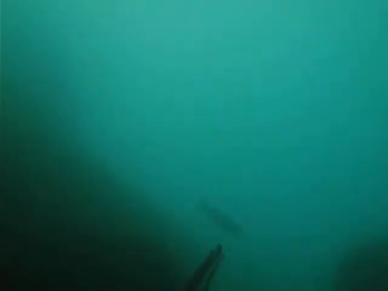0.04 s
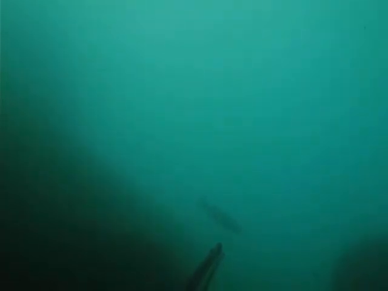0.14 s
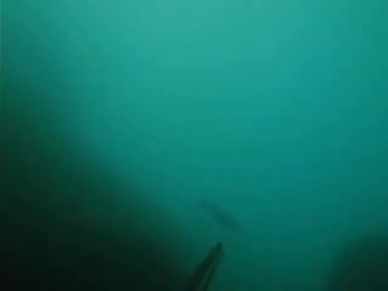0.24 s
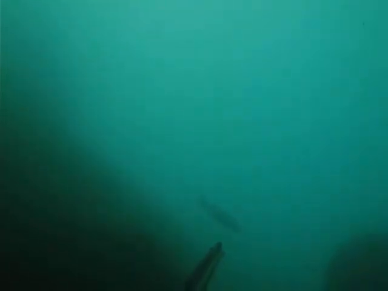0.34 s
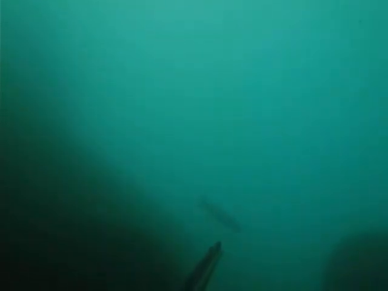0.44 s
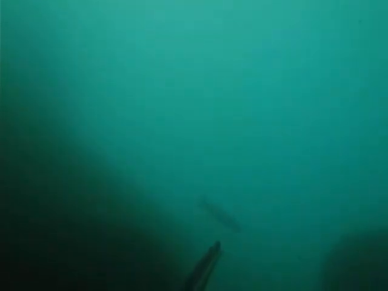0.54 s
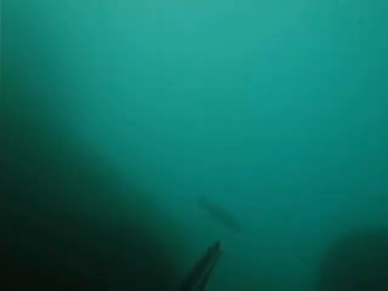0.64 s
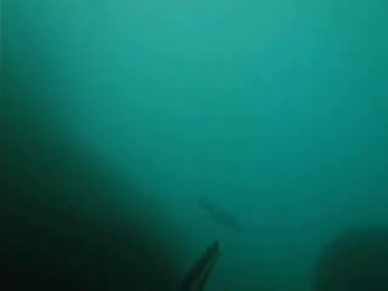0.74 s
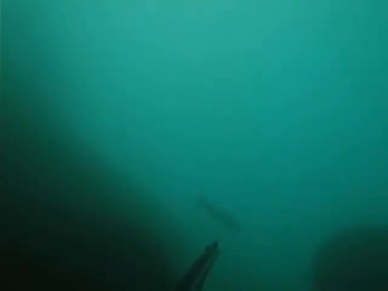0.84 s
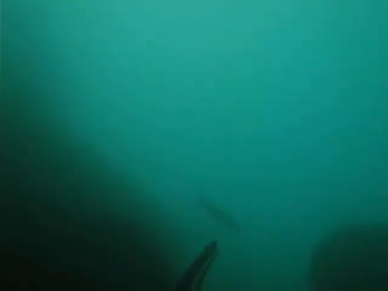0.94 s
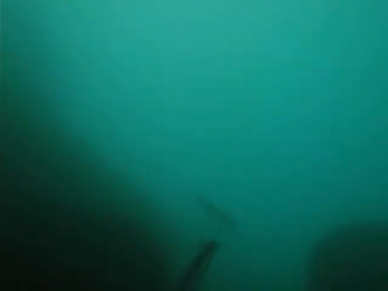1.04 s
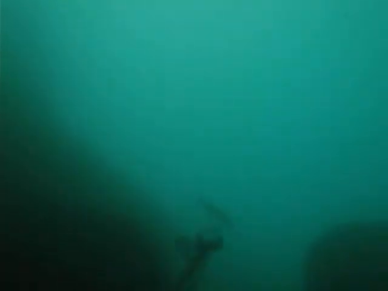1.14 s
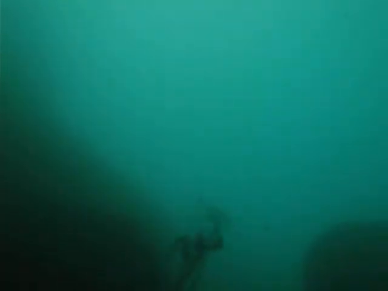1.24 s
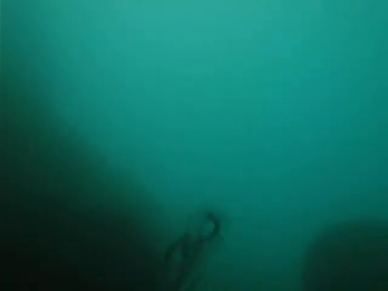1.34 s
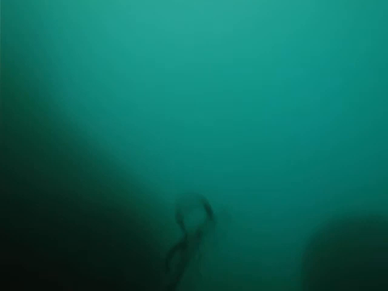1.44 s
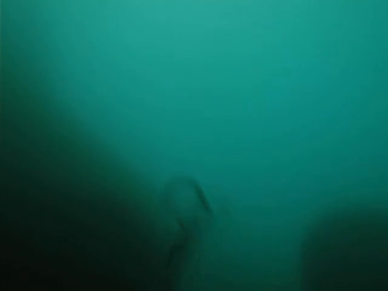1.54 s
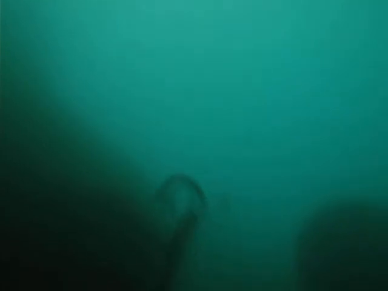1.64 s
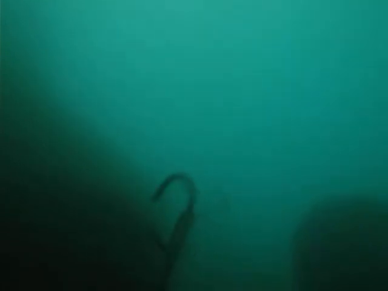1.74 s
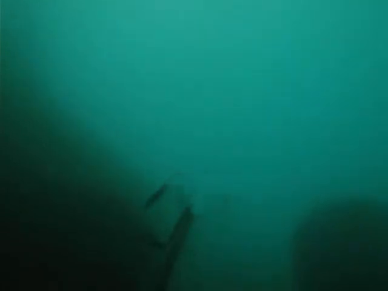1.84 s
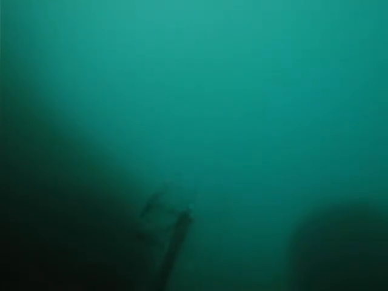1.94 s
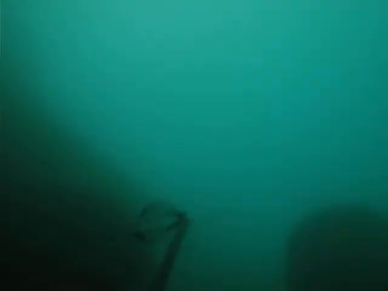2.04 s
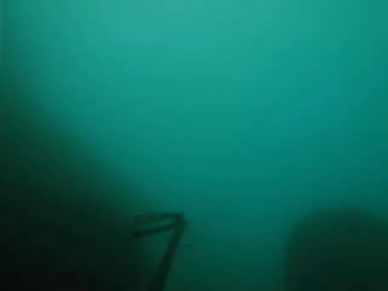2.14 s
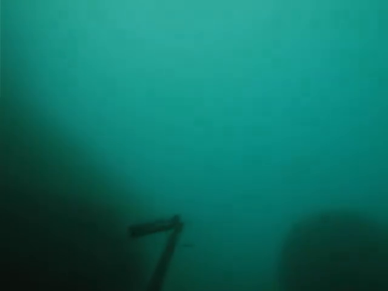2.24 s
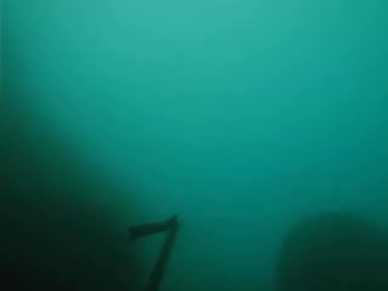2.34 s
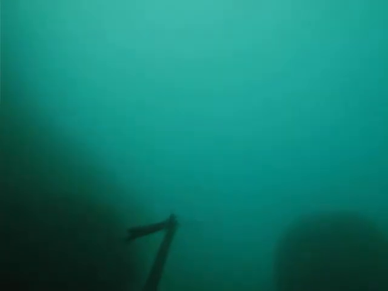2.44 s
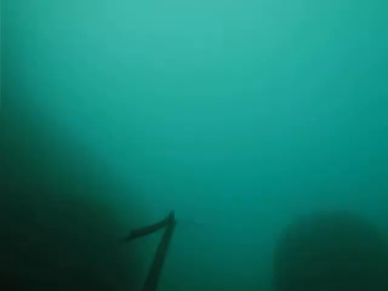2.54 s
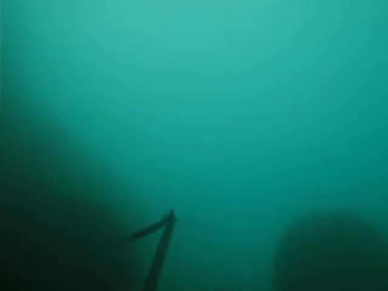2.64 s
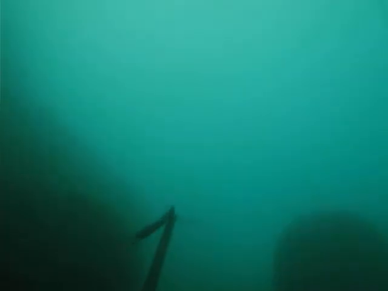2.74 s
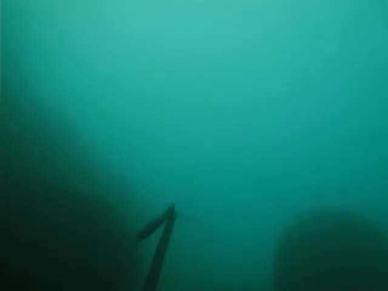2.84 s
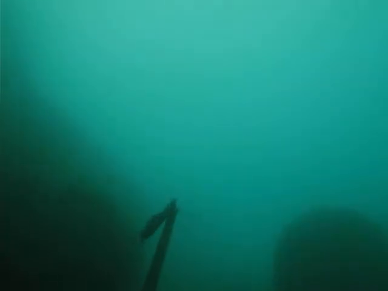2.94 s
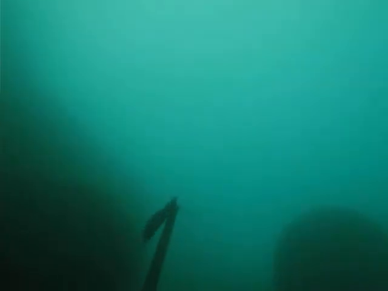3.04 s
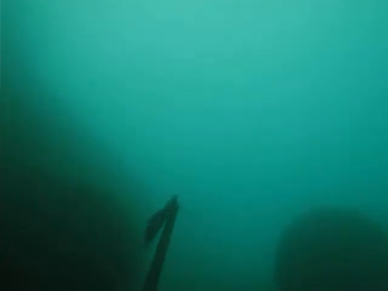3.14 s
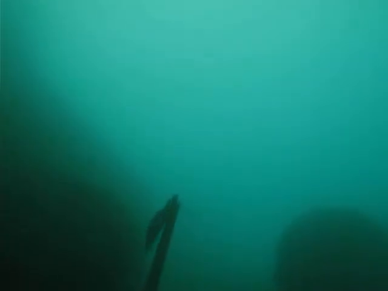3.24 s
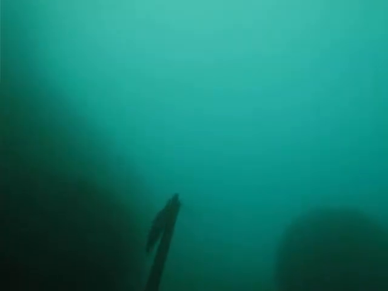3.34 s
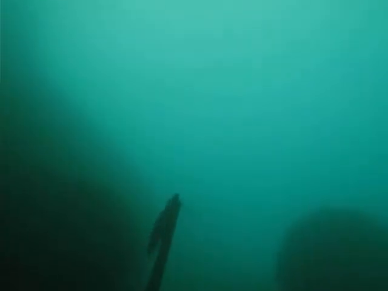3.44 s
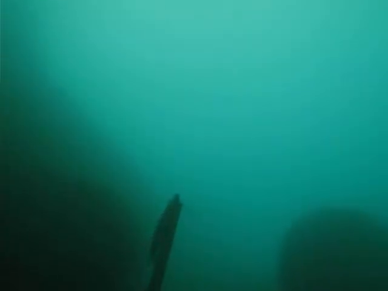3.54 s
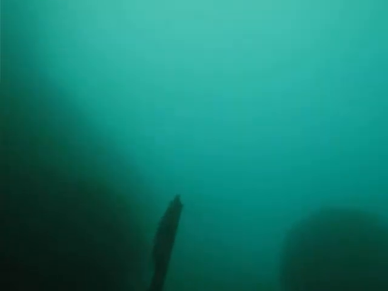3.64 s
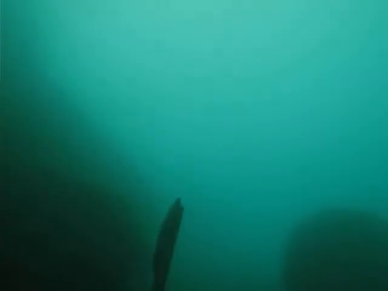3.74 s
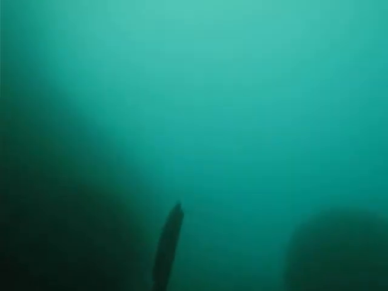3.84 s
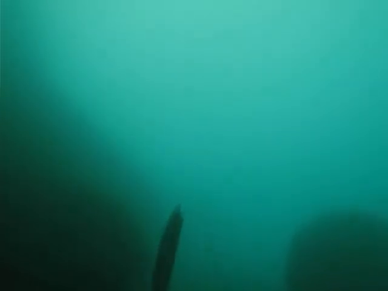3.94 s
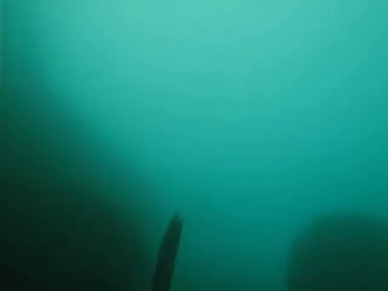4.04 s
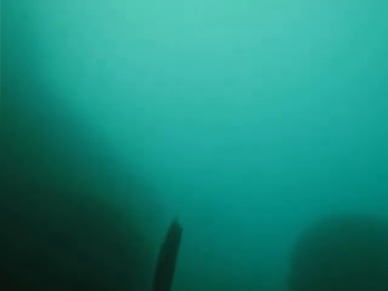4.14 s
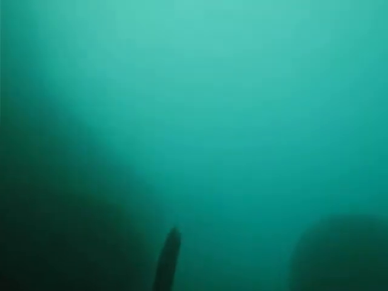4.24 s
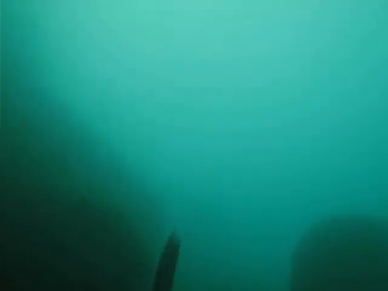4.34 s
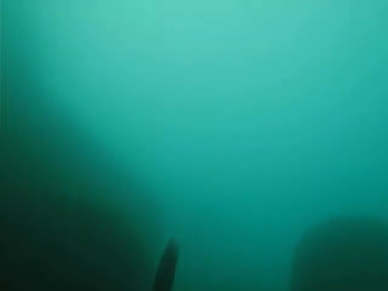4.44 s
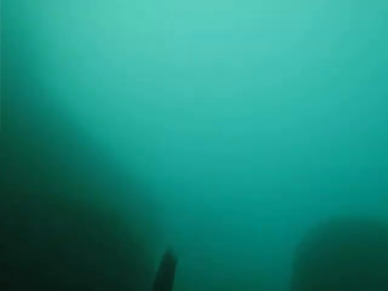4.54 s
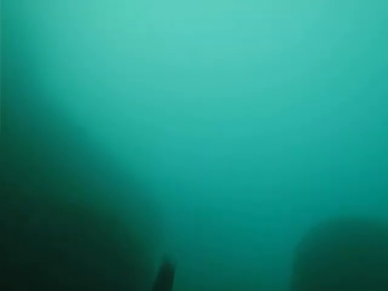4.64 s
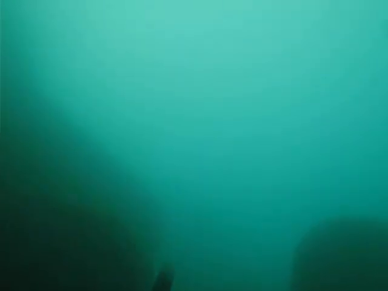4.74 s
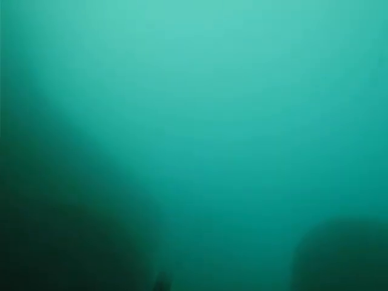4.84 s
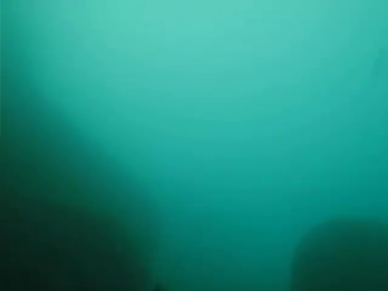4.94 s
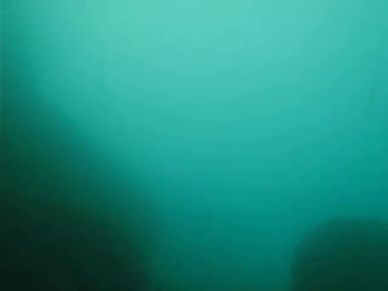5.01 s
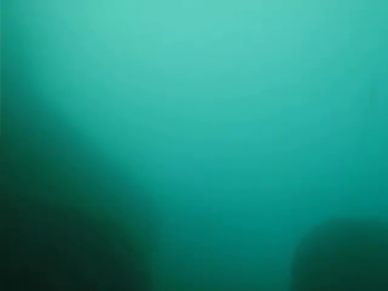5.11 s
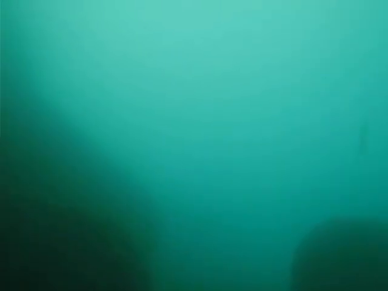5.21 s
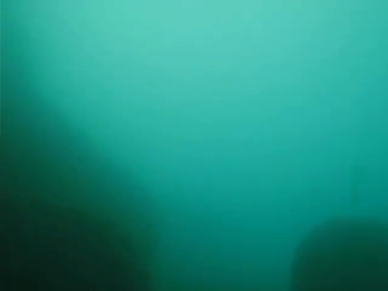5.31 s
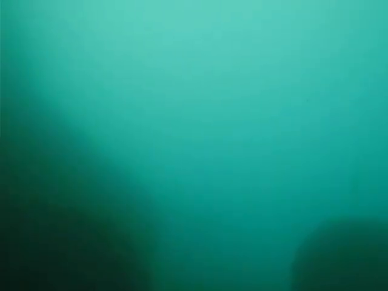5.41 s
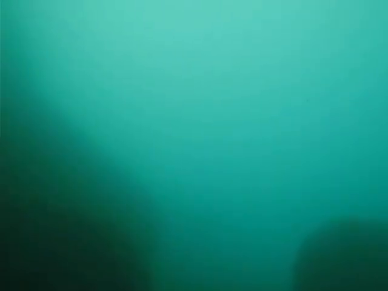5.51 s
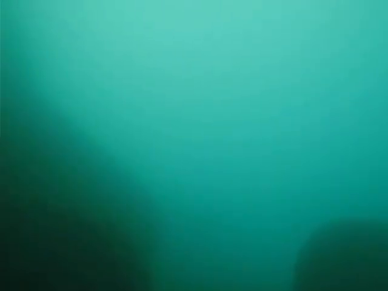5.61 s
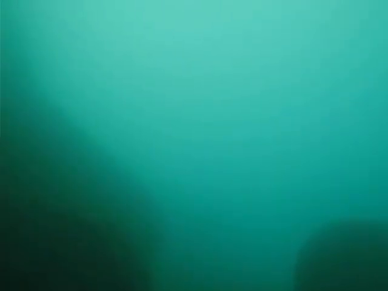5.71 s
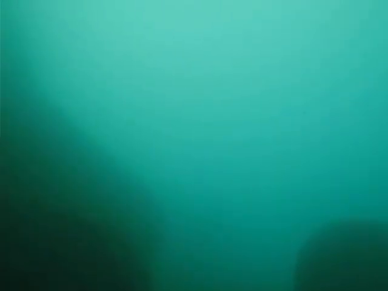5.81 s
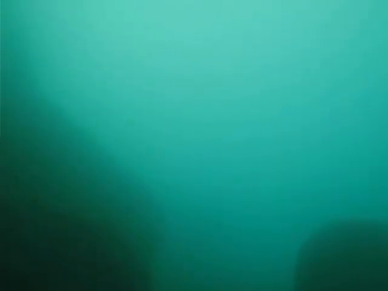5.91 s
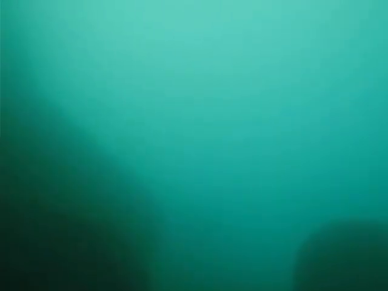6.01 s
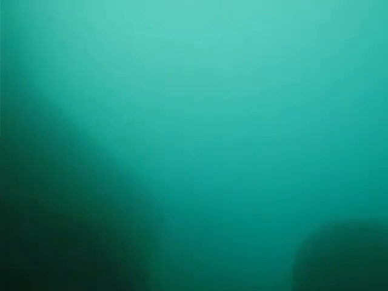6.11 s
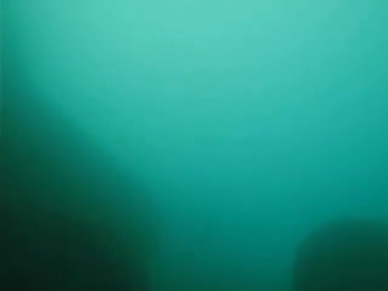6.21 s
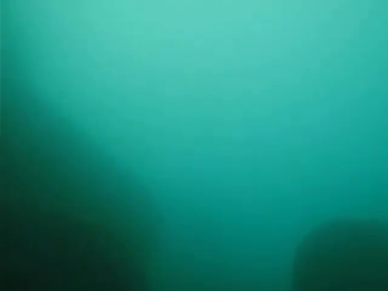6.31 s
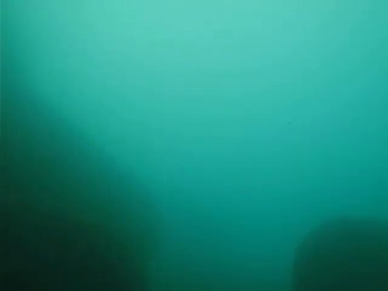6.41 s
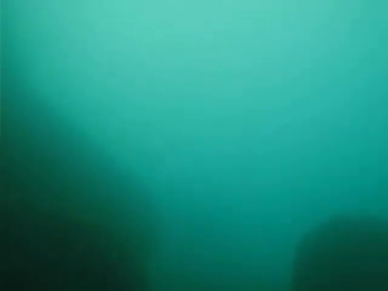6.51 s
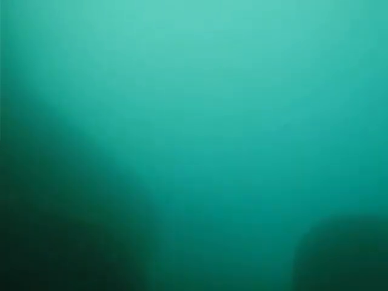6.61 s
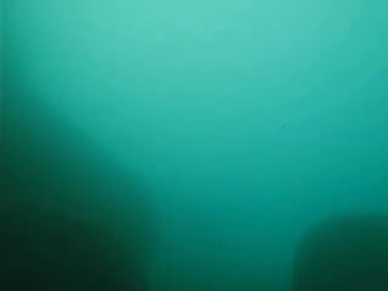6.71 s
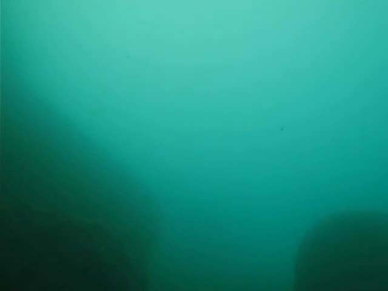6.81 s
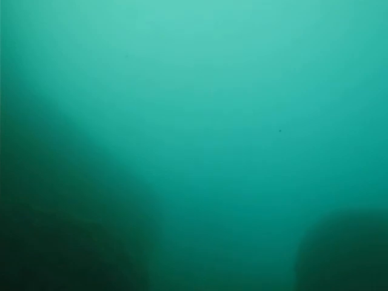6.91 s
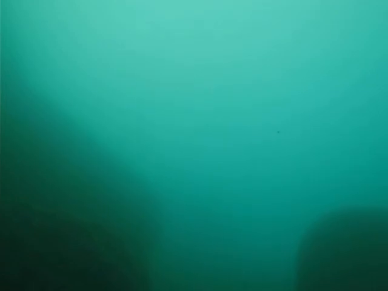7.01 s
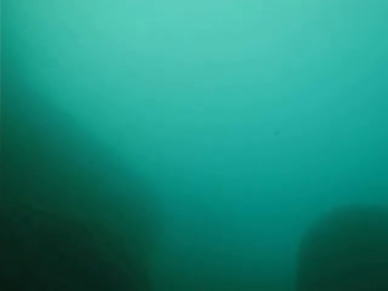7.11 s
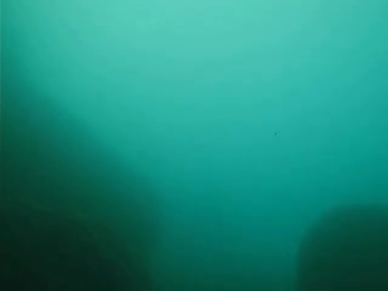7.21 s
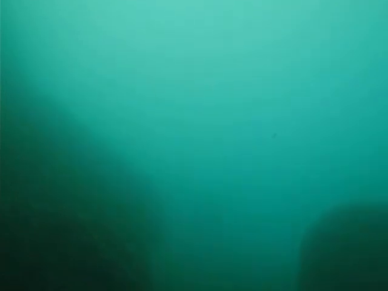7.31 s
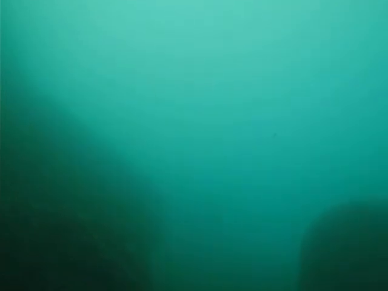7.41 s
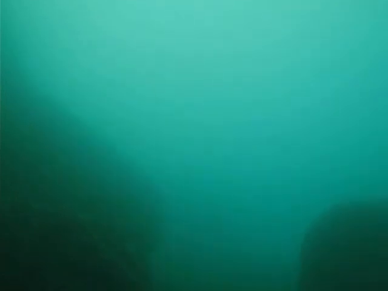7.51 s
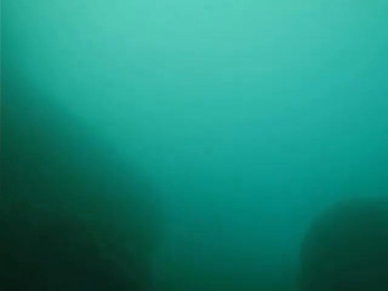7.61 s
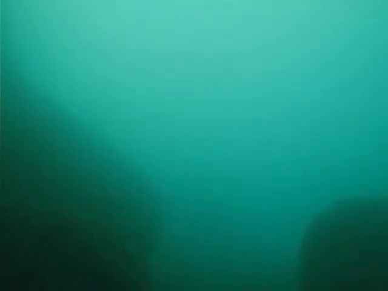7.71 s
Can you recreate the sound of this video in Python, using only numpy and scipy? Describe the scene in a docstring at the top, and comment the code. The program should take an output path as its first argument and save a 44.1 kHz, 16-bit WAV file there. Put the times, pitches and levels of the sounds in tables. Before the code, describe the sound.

A hard metallic crack and clatter from a speargun underwater, fading in a short fizz; sparse clicks follow, then a gurgling burst of air bubbles.

```python
"""Speargun fired under water

Heard from a camera in a sealed housing. The trigger snaps, the spear rasps and rattles out of its track
(enveloped grains), the gun knocks (damped sines) and the spear rings briefly (bending modes).
Later air bubbles plop loose: rising damped sines with rough clicks, among a trickle of small chirps.
Sharp ticks and faint shrimp crackle (resonated noise and clicks) sit on the sea's coloured-noise wash,
a faint rub and squeak of the grip, and the camera's steady sine whine."""
import sys
import numpy as np
from scipy import signal
from scipy.fft import rfft, irfft
from scipy.io import wavfile

SR = 44100
rng = np.random.default_rng(int(sys.argv[2]) if len(sys.argv) > 2 else 0)


def persist_wave(psi):
    """Save psi, clipped to +-1, as 16-bit WAV."""
    counts = np.round(np.clip(psi, -1, 1) * 32767).astype(np.int16)
    wavfile.write(sys.argv[1], SR, np.atleast_2d(counts).T)


N = 342216
TIME_S = np.arange(N) / SR

# Dull colour of the shot. Each row: frequency in Hz, relative density in dB per Hz.
DULL_COLOUR = [(30, -22.5), (120, -11), (340, -16), (440, -2), (660, 2), (790, -5), (950, -4), (1150, -4),
               (1450, -1.5), (1750, 3.5), (2200, -10), (3200, -28)]
# Bright colour of the shot. Each row: frequency in Hz, relative density in dB per Hz.
BRIGHT_COLOUR = [(1200, -31), (2000, -13), (2500, 0), (3200, -4), (3700, 1), (4600, -6), (6200, 0.5),
                 (7800, -5.5), (10000, -2), (11200, -11.5), (13500, -18.5), (16000, -23)]
# Housing resonances. Each row: centre in Hz, width in Hz, level in dB before the ring_db of each sound.
HOUSING_MODES = [(470.6, 24, 7), (620, 65, 3), (906, 95, 3), (1120, 38, -0.5), (1410, 43, -1.5),
                 (1553, 180, -3), (2080, 56, -10), (2486, 60, -4), (2760, 120, -1.5), (3620, 280, -7.5),
                 (4200, 260, -10), (4930, 73, -6), (5300, 160, -16), (5760, 360, -12.5), (9740, 300, -8),
                 (13500, 900, 1.5)]
# Slaps of spear and bands on the gun. Each row: time in seconds, bright level in dB, dull level in dB.
# Levels precede DULL_GAIN_DB and the random grains.
SLAPS = [(1.086, -27, -35), (1.0995, -21, -25), (1.1175, -22.5, -36), (1.126, -21.5, -46),
         (1.1375, -29, -40), (1.152, -34, -32), (1.1583, -24.5, -34), (1.164, -36, -31.5),
         (1.192, -37, -39), (1.221, -49, -68), (1.236, -51, -53), (1.274, -51, -54)]
# Hollow knocks: release, bands coming home, gun shifting in the hand.
# Each row: start in seconds, peak envelope in dB, pitch in Hz.
KNOCKS = [(1.0645, -19, 945), (1.085, -27.5, 1440), (1.099, -22, 1350), (1.103, -24, 500),
          (1.111, -27, 620), (1.1214, -23.5, 1650), (1.153, -32, 454), (2.492, -58, 302), (2.721, -47, 490),
          (2.869, -44, 650)]
# Bending modes of the steel spear. Each row: pitch in Hz, relative level in dB, t60 in seconds.
SPEAR_MODES = [(2780, -4.5, 0.33), (2870, 9.5, 0.041), (3628, -27, 0.36), (4737, -26, .3),
               (5900, -23, 0.19)]
# Blows that set the spear ringing. Each row: start in seconds, gain on the modes in dB.
SPEAR_BLOWS = [(1.14, -60), (1.196, -44.5)]
# Separate bubbles, faint and strong. Each row: start in seconds, gain in dB, starting pitch in Hz,
# pinch-off click gain in dB, click pitch in Hz.
BUBBLES = [(2.514, -54, 1520, -44.5, 2360), (3.655, -47, 1590, -52, 2700), (3.713, -47, 1480, -52, 2720),
           (3.739, -43, 1490, -49, 2770), (4.439, -46.5, 1420, -49, 2520), (4.852, -41, 1510, -44, 890),
           (4.868, -37.5, 1570, -44, 910), (4.970, -39, 1480, -52, 2840), (5.658, -53, 1420, -41, 2400),
           (5.68, -32.5, 1470, -52, 3920), (5.785, -41.5, 1570, -43, 2750), (5.81, -37, 1520, -29.5, 2480),
           (5.939, -37.5, 958, -41, 2670), (6.068, -48, 1500, -53, 2280), (6.078, -40, 1550, -42.5, 2270),
           (6.096, -36, 1135, -34.5, 2340), (6.13, -40.5, 1485, -60, 2940), (6.209, -31.5, 1173, -37, 2780),
           (6.252, -28.5, 1520, -21, 4240), (6.274, -35, 970, -33, 1650), (6.288, -28, 1475, -35, 3920),
           (6.353, -33.5, 1780, -52, 2380), (6.452, -25.5, 1890, -37, 2370), (6.5627, -37, 970, -30, 3410),
           (6.645, -44.5, 1580, -48.5, 3410), (6.785, -44, 1590, -65, 2800),
           (7.036, -27.5, 1170, -38.5, 1610), (7.216, -40.5, 913, -54, 1540)]
# Rate of small bubbles, interpolated; none below zero. Each row: time in seconds, bubbles per second.
TRICKLE_RATE = [(4.7, 1), (5.6, 37), (6.05, 47), (6.18, 62), (6.24, 270), (6.33, 140), (6.38, 35.5),
                (6.8, -4)]
# Ticks at set times, faint and loud. Each row: time in seconds, nominal peak in dB, centre in Hz.
TICKS = [(0.144, -38, 8050), (1.248, -32, 5700), (1.383, -28.5, 6340), (1.402, -42, 3180),
         (1.488, -41, 7700), (1.615, -39, 4330), (1.645, -36.5, 7200), (1.741, -34.5, 9400),
         (2.188, -38, 10700), (2.304, -37.5, 7700), (3.038, -29.5, 4060), (3.038, -28.5, 10400),
         (3.791, -39.5, 8750), (4.025, -33.5, 7400), (4.228, -30.5, 7900), (5.3, -45.5, 4960),
         (5.586, -38.5, 7200), (5.748, -36.5, 7100), (5.7834, -35, 6500), (5.952, -32, 7600),
         (6.022, -30, 4500), (6.2075, -32, 5760), (6.267, -30, 8900), (6.516, -23, 4260),
         (6.534, -34.5, 9100), (7.303, -37.5, 9100)]
# Colour of the ticks. Each row: frequency in Hz, relative density in dB per Hz.
TICK_COLOUR = [(500, -6.5), (3600, -0.5), (10300, -1), (11500, -6.0), (13500, -23), (16000, -9.0)]
# Colour of the shrimp. Each row: frequency in Hz, relative density in dB per Hz.
SHRIMP_COLOUR = [(1500, -4.5), (3000, 2.0), (10500, -4), (12000, -10.5)]
# Colour of sea wash and hiss. Each row: frequency in Hz, relative density in dB per Hz.
WASH_COLOUR = [(25, 2), (60, -6.5), (200, -10.5), (330, -9), (440, -1.5), (650, -2.5), (760, -4.5),
               (1000, -3), (1550, -6.5), (2000, -11.5), (4500, -15.5), (7000, -17.5), (10200, -20.5),
               (11800, -34.5), (16000, -30)]

# Shot: levels before grains and DULL_GAIN_DB
SNAP_AT_S, SNAP_SWELL_S, SNAP_T60_S = 1.066, 0.00073, 0.014
SNAP_DULL_DB, SNAP_BRIGHT_DB = -24, -13
SLIDE_AT_S, SLIDE_HOLD_S, SLIDE_SWELL_S, SLIDE_T60_S = 1.085, 0.034, 0.006, 0.014
SLIDE_DULL_DB, SLIDE_BRIGHT_DB = -25.5, -36
FIZZ_DB, FIZZ_HOLD_S, FIZZ_T60_S = -32, 0.018, 0.32
FIZZ_SPUTTER_DB, FIZZ_SPUTTERS_PER_S = 5, 200
SLAP_SWELL_S, SLAP_T60_S = 0.0013, 0.033
DULL_GAIN_DB = -2.0
# Knocks and recoil
KNOCK_T60_S = 0.028
RECOIL_DB, RECOIL_HZ, RECOIL_T60_S = -29.5, 85.2, 0.011
# Bubbles: ring and churn relative to each bubble's gain; cycles counted over t60 at the starting pitch
BUBBLE_CYCLES, BUBBLE_RING_DB, BUBBLE_CHURN_DB, CHURN_T60_S = 36, -2.5, -13, 0.028
TRICKLE_DB, TRICKLE_LOW_HZ, TRICKLE_OCTAVES, TRICKLE_CYCLES = -58.5, 950, 1.87, 26
GURGLE_HZ, GURGLE_WIDTH_HZ, GURGLE_DB = 1545, 42, 2.5
# Ticks: random ones drawn within (low, high)
TICK_T60_S = 0.025
RANDOM_TICKS_PER_S, RANDOM_TICK_DB, RANDOM_TICK_HZ = 1.5, (-49, -41.5), (6000, 10400)
# Background: crackle level precedes its colouring
CRACKLE_PER_S, CRACKLE_DB = 58, -74.5
WASH_DB = -60
RUB_AT_S, RUB_HOLD_S, RUB_SWELL_S, RUB_T60_S, RUB_DB = 3.63, 0.2, 0.037, 0.6, -67
WHINE_HZ, WHINE_DB = 5893, -75.5
CUTOFF_HZ = 15900


def from_db(db):
    """Amplitude factor of a level in dB."""
    return 10 ** (np.asarray(db) / 20)


def unit_energy(response):
    """Scale an impulse response to energy 1."""
    return response / np.sqrt(np.sum(response ** 2))


def add(track, start_s, sound):
    """Lay a short sound into a track."""
    at = round(start_s * SR)
    track[at:at + len(sound)] += sound[:N - at]


def resonance(x, hz, width_hz):
    """Two-pole resonance with gain 1 on top."""
    radius = np.exp(-np.pi * width_hz / SR)
    zeros = np.array([1, 0, -1]) * (1 - radius ** 2) / 2
    poles = [1, -2 * radius * np.cos(2 * np.pi * hz / SR), radius ** 2]
    return signal.lfilter(zeros, poles, x)


def housed(x, colour, ring_db, size=4096):
    """Minimum-phase colour plus housing resonances; white noise keeps its level."""
    hz, db = np.transpose(colour)
    grid_hz = np.maximum(np.arange(size // 2 + 1) * SR / size, 1)
    gain = from_db(np.interp(np.log(grid_hz), np.log(hz), db))
    # folding the cepstrum makes the response causal
    cepstrum = irfft(np.log(gain))
    cepstrum[1:size // 2] *= 2
    cepstrum[size // 2 + 1:] = 0
    direct = irfft(np.exp(rfft(cepstrum)))
    ringing = sum(from_db(mode_db + ring_db) * resonance(direct, mode_hz, width_hz)
                  for mode_hz, width_hz, mode_db in HOUSING_MODES)
    return signal.fftconvolve(x, unit_energy(direct + ringing))[:N]


def scatter(x, wet_db, t60_s):
    """Gun, diver and rocks throw back a short, dense cloud of echoes."""
    t = TIME_S[:SR // 4]
    envelope = burst(t - 0.003, swell_s=0.00042, t60_s=t60_s)
    cloud = unit_energy(rng.standard_normal(len(t)) * envelope)
    return x + from_db(wet_db) * signal.fftconvolve(x, cloud)[:N]


def burst(t, swell_s, t60_s, hold_s=0):
    """Envelope that swells to 1 at t = 0, holds, then dies away."""
    swell = np.minimum(t, 0) / swell_s
    decay = np.log(1000) * np.maximum(t - hold_s, 0) / t60_s
    return np.exp(swell - decay)


def damped_sine(t, hz, t60_s, swell_s, rise=0):
    """Ring with peak envelope 1; its pitch climbs by the share `rise` over t60."""
    envelope = (1 - np.exp(-(t / swell_s) ** 2)) * np.exp(-np.log(1000) * t / t60_s)
    pitch_hz = hz * (1 + rise * np.minimum(t / t60_s, 1))
    phase = 2 * np.pi * np.cumsum(pitch_hz) / SR
    return envelope / envelope.max() * np.sin(phase)


def grains(per_s, spread_db):
    """Clicks of uneven size and sign at random moments; rms 1."""
    sizes = from_db(spread_db * np.minimum(rng.exponential(1, N), 3))
    signs = rng.choice([-1, 1], N)
    clicks = sizes * signs * (rng.random(N) < per_s / SR)
    return clicks / np.std(clicks)


def together(parts):
    """Envelopes of unrelated noises, given as (dB, envelope), add in power."""
    return np.sqrt(sum((from_db(db) * envelope) ** 2 for db, envelope in parts))


def shot():
    """Snap, slide and slaps are bursts of tiny impacts and collapsing cavities, which shake the housing."""
    snap = burst(TIME_S - SNAP_AT_S, SNAP_SWELL_S, SNAP_T60_S)
    slide = burst(TIME_S - SLIDE_AT_S, SLIDE_SWELL_S, SLIDE_T60_S, SLIDE_HOLD_S)
    # cavities fizz from the snap on and die out unevenly behind the spear
    sputter = np.interp(TIME_S * FIZZ_SPUTTERS_PER_S, np.arange(N), rng.standard_normal(N))
    fizz = burst(TIME_S - SNAP_AT_S, SNAP_SWELL_S, FIZZ_T60_S, FIZZ_HOLD_S)
    fizz = fizz * from_db(FIZZ_SPUTTER_DB * sputter)
    dull_parts = [(SNAP_DULL_DB, snap), (SLIDE_DULL_DB, slide)]
    bright_parts = [(SNAP_BRIGHT_DB, snap), (SLIDE_BRIGHT_DB, slide), (FIZZ_DB, fizz)]
    for at_s, bright_db, dull_db in SLAPS:
        slap = burst(TIME_S - at_s, SLAP_SWELL_S, SLAP_T60_S)
        dull_parts.append((dull_db, slap))
        bright_parts.append((bright_db, slap))
    dull_grains = together(dull_parts) * grains(per_s=4000, spread_db=2.5)
    bright_grains = together(bright_parts) * grains(per_s=11000, spread_db=1.0)
    dull = housed(dull_grains, DULL_COLOUR, ring_db=-2.5)
    bright = housed(bright_grains, BRIGHT_COLOUR, ring_db=1.5)
    return from_db(DULL_GAIN_DB) * dull + bright


def knocks():
    """Each knock is one heavily damped ring; the recoil gives the housing a low thump beneath the first."""
    out, t = np.zeros(N), TIME_S[:SR // 4]
    for start_s, db, hz in KNOCKS:
        add(out, start_s, from_db(db) * damped_sine(t, hz, KNOCK_T60_S, swell_s=0.00041))
    thump = damped_sine(t, RECOIL_HZ, RECOIL_T60_S, swell_s=0.00049)
    add(out, SNAP_AT_S, from_db(RECOIL_DB) * thump)
    return out


def spear():
    """The steel shaft rings as it leaves the muzzle; water damps it quickly."""
    out, t = np.zeros(N), TIME_S[:SR]
    ring = sum(from_db(db) * damped_sine(t, hz, t60_s, swell_s=0.00039) for hz, db, t60_s in SPEAR_MODES)
    for start_s, db in SPEAR_BLOWS:
        add(out, start_s, from_db(db) * ring)
    return out


def bubbles():
    """Each bubble pinches off with a short, rough click, then pulses at its pitch and churns the water."""
    out, t = np.zeros(N), TIME_S[:SR // 6]
    noises = rng.standard_normal((len(BUBBLES), len(t)))
    for (start_s, db, hz, click_db, click_hz), noise in zip(BUBBLES, noises):
        churn = resonance(resonance(noise, hz, hz * 0.43), hz, hz * 0.43)
        churn_envelope = burst(t - 0.001, swell_s=0.00033, t60_s=CHURN_T60_S)
        churn = from_db(BUBBLE_CHURN_DB) * churn / np.std(churn) * churn_envelope
        plop = damped_sine(t, hz, BUBBLE_CYCLES / hz, swell_s=0.001, rise=0.044)
        plop = from_db(BUBBLE_RING_DB) * plop
        splash = resonance(resonance(noise, click_hz, click_hz * 0.45), click_hz, click_hz * 0.47)
        splash_envelope = burst(t - 0.001, swell_s=0.00034, t60_s=0.0085)
        splash = from_db(-9.0) * splash / np.std(splash) * splash_envelope
        click = from_db(-1.0) * damped_sine(t, click_hz, t60_s=0.02, swell_s=0.00023) + splash
        add(out, start_s, from_db(db) * (plop + churn + nudge(t)) + from_db(click_db) * click)
    out = out + trickle()
    # the gurgle favours one pitch, which lingers
    gurgle = from_db(GURGLE_DB) * resonance(out, GURGLE_HZ, GURGLE_WIDTH_HZ)
    return scatter(out + gurgle, wet_db=-10, t60_s=0.0047)


def nudge(t):
    """The push of a bubble gives the housing a faint, dull bump of three damped modes."""
    wall = from_db(-23) * damped_sine(t, hz=438, t60_s=0.057, swell_s=0.0013)
    flex = from_db(-25.5) * damped_sine(t, hz=247, t60_s=0.014, swell_s=0.0019)
    sway = from_db(-20.5) * damped_sine(t, hz=73, t60_s=0.012, swell_s=0.00086)
    return wall + flex + sway


def trickle():
    """Small bubbles of many sizes chirp upwards, louder as the air comes faster, smeared by echoes."""
    out, t = np.zeros(N), TIME_S[:SR // 20]
    per_s = np.interp(TIME_S, *np.transpose(TRICKLE_RATE))
    born = np.flatnonzero(rng.random(N) < per_s / SR)
    for at, (smallness, distance) in zip(born, rng.random((len(born), 2))):
        hz = TRICKLE_LOW_HZ * 2 ** (TRICKLE_OCTAVES * smallness)
        gain = from_db(TRICKLE_DB - 7.7 * distance - 20.4 * smallness) * np.sqrt(per_s[at])
        chirp = damped_sine(t, hz, t60_s=TRICKLE_CYCLES / hz, swell_s=0.00026, rise=0.2)
        add(out, at / SR, gain * chirp)
    return scatter(out, wet_db=-0.5, t60_s=0.076)


def ticks():
    """A tick is a broad crack with one favoured pitch, dying within milliseconds, then echoed."""
    out, t = np.zeros(N), TIME_S[:SR // 10]
    rows = TICKS + random_ticks()
    envelope = burst(t - 0.004, swell_s=0.001, t60_s=TICK_T60_S)
    for (at_s, db, hz), noise in zip(rows, rng.standard_normal((len(rows), len(t)))):
        broad = resonance(noise, hz, width_hz=4400)
        pitched = from_db(5.5) * resonance(noise, hz, width_hz=1300)
        crack = broad + pitched
        # -10.5 dB: nominal peak to rms
        tick = from_db(db - 10.5) * crack / np.std(crack) * envelope
        add(out, max(at_s - 0.003, 0), tick)
    return housed(scatter(out, wet_db=-14.5, t60_s=0.16), TICK_COLOUR, ring_db=13)


def random_ticks():
    """Faint ticks at random times as rows of (seconds, nominal peak dB, centre Hz)."""
    draws = rng.random((round(RANDOM_TICKS_PER_S * N / SR), 3))
    return [(when * N / SR, np.interp(level, (0, 1), RANDOM_TICK_DB), np.interp(pitch, (0, 1), RANDOM_TICK_HZ))
            for when, level, pitch in draws]


def shrimp(count=10):
    """Faint snaps from shrimp in the rocks: clicks through fixed resonances, smeared on their way."""
    pitches_hz = np.geomspace(2600, 10200, count)
    snaps = sum(resonance(grains(CRACKLE_PER_S / count, spread_db=2.0), hz, hz * 0.16) for hz in pitches_hz)
    snaps = scatter(snaps, wet_db=12, t60_s=0.03)
    return from_db(CRACKLE_DB) * housed(snaps / np.std(snaps), SHRIMP_COLOUR, ring_db=-13)


def grip():
    """The grip rubs as the gun is lowered, then squeaks: one run of slips through low and high resonances."""
    slips = grains(per_s=240, spread_db=4.0)
    rub = resonance(resonance(slips, hz=235, width_hz=84), hz=237, width_hz=330)
    rub_envelope = burst(TIME_S - RUB_AT_S, RUB_SWELL_S, RUB_T60_S, RUB_HOLD_S)
    squeak = resonance(slips, hz=3600, width_hz=190)
    squeak_envelope = burst(TIME_S - 4.23, swell_s=0.088, t60_s=0.57)
    rub = from_db(RUB_DB) * rub_envelope * rub / np.std(rub)
    return rub + from_db(-63) * squeak_envelope * squeak / np.std(squeak)


def wash():
    """The sea washes through the housing as steady coloured noise."""
    return from_db(WASH_DB) * housed(rng.standard_normal(N), WASH_COLOUR, ring_db=0.5)


def whine():
    """The camera whines on one steady sine; its level is rms."""
    return from_db(WHINE_DB) * np.sqrt(2) * np.sin(2 * np.pi * WHINE_HZ * TIME_S)


def scene():
    """Everything reaches the one microphone inside the housing."""
    gun = shot() + knocks() + spear()
    background = wash() + grip() + whine()
    return (gun + bubbles() + ticks() + shrimp() + background)[None]


def record(dry):
    """A steep elliptic low-pass cuts the top."""
    lowpass = signal.ellip(10, 0.1, 80, CUTOFF_HZ, fs=SR, output="sos")
    return signal.sosfilt(lowpass, dry)


dry = scene()
out = record(dry)
persist_wave(out)
```